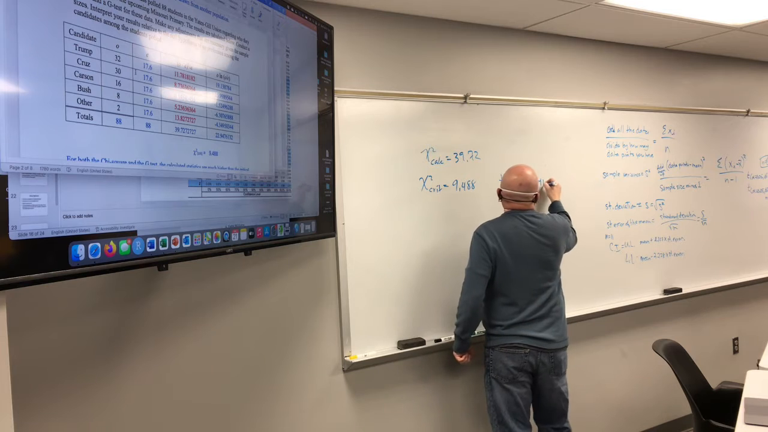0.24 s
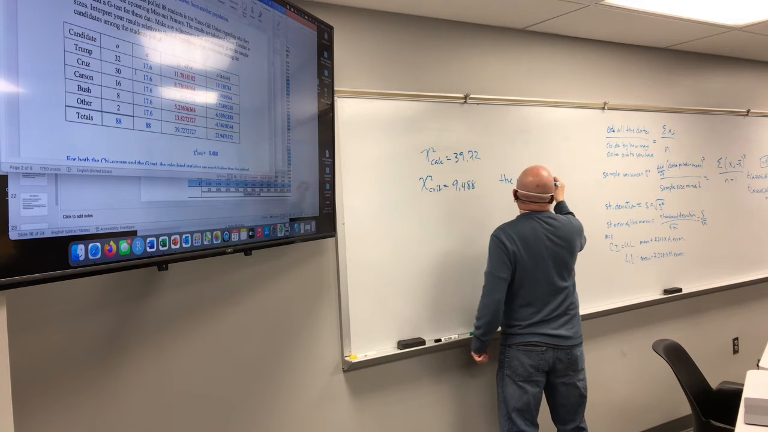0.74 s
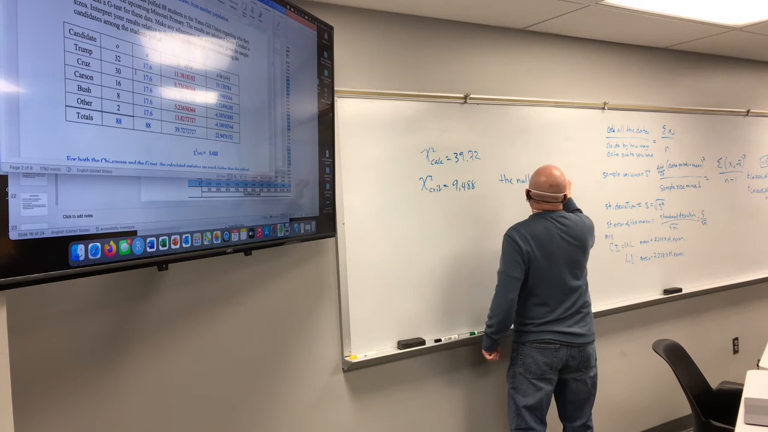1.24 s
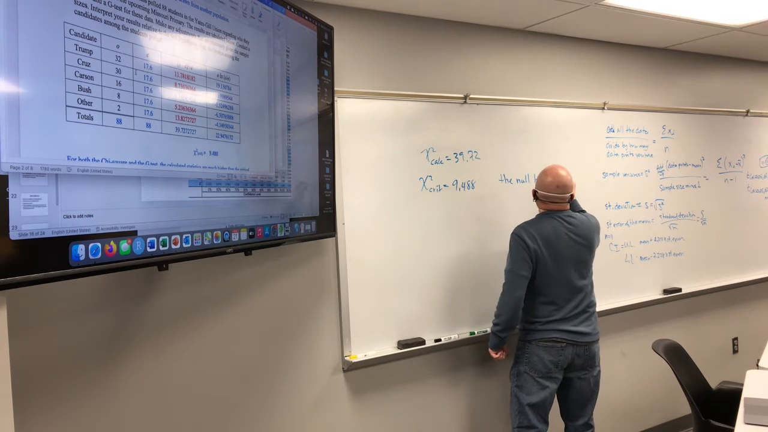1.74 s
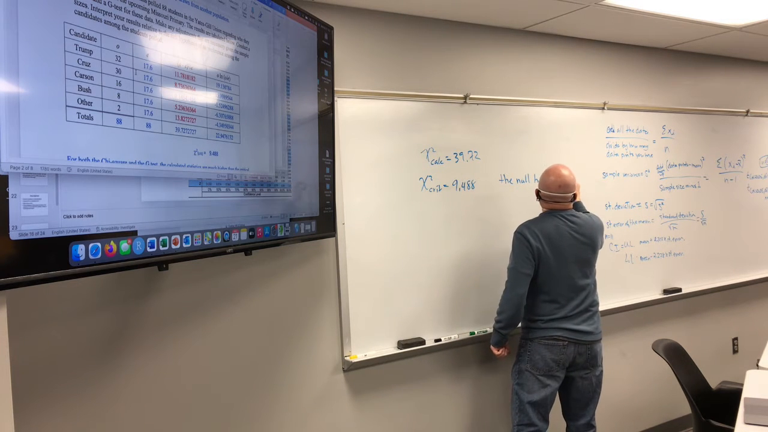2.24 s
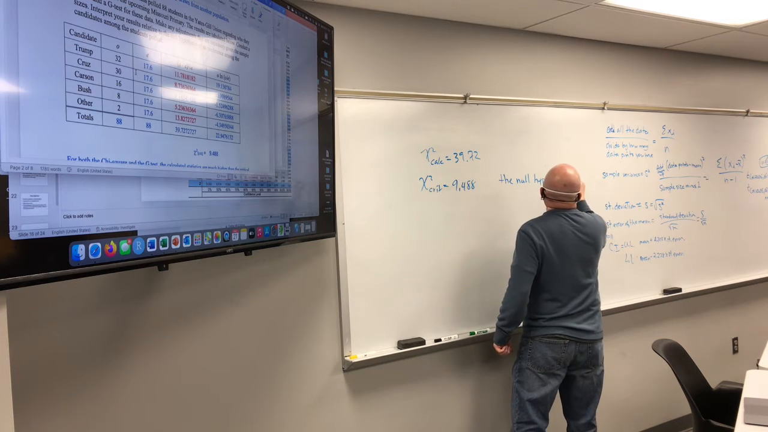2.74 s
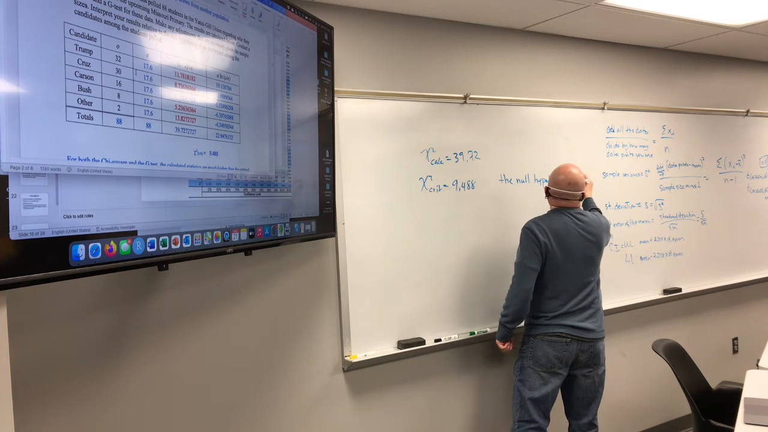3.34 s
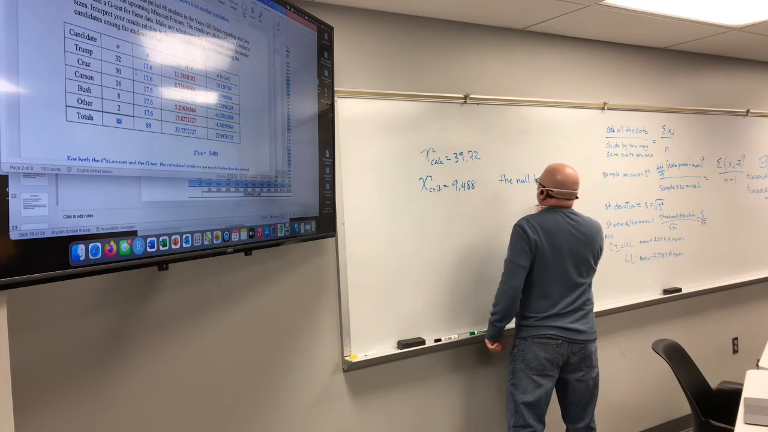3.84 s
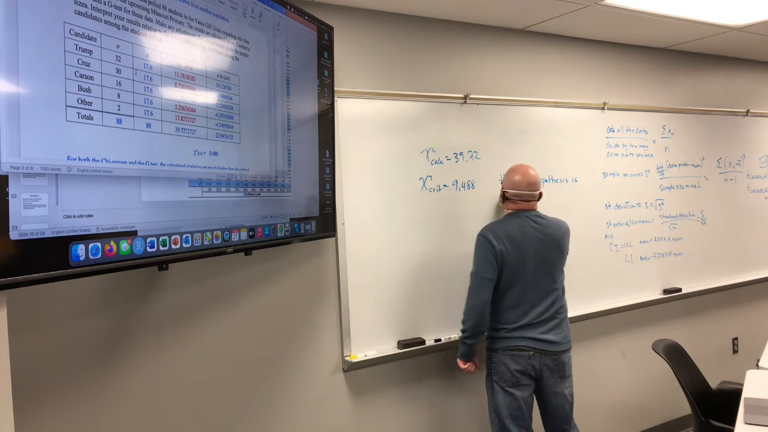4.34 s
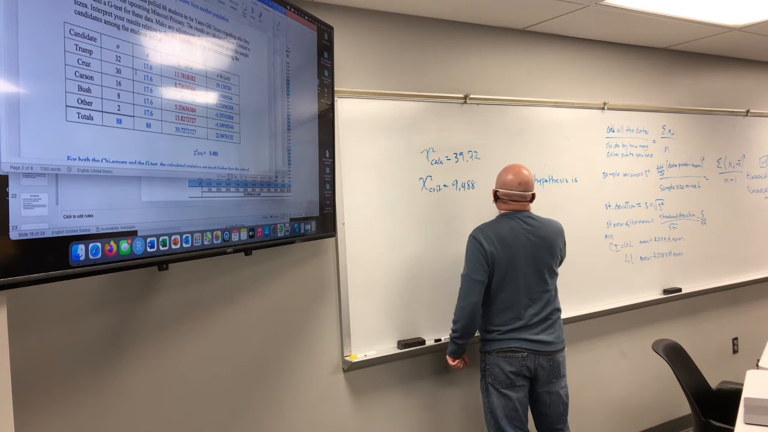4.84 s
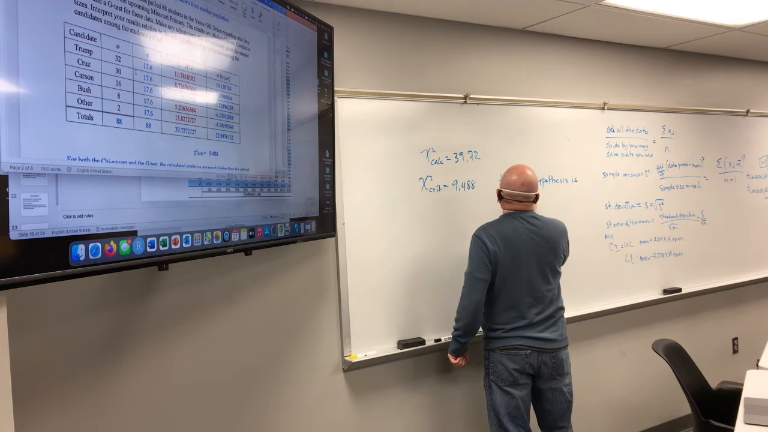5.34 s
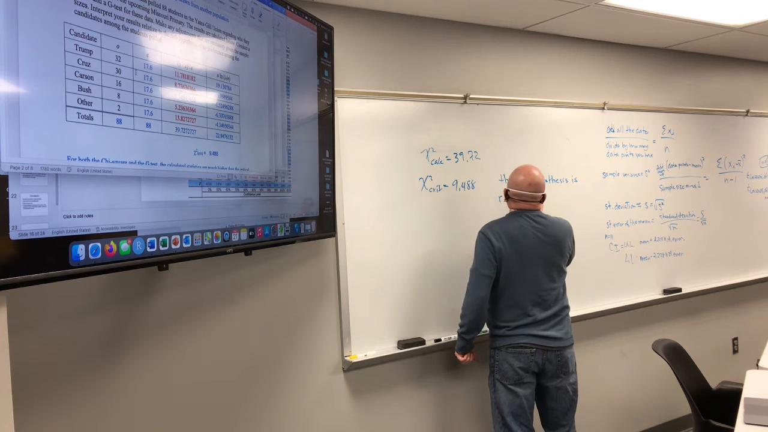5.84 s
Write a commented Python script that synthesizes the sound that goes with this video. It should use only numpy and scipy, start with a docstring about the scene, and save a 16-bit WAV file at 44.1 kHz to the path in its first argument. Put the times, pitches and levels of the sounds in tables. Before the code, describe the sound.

A felt-tip marker writes on a hollow wall-mounted whiteboard in a quiet room, with dull knocks, low droning rubs and faint squeaks.

```python
"""A marker writes on a hollow wall-mounted whiteboard in a quiet classroom, heard through a phone.
Landings strike decaying board modes, a knock and a barrel tick; slow panel modes thud beneath.
Random felt slips drive resonances that drone, rasp, hiss, scrape, squeal and scuff; squeaks are gliding tones.
Filtered noise makes low panel rumbles, faint ventilation, and the room's near scatter and short tail."""
import sys
import numpy as np
from scipy import signal
from scipy.fft import rfft, irfft
from scipy.io import wavfile

SR = 44100
rng = np.random.default_rng(int(sys.argv[2]) if len(sys.argv) > 2 else 0)


def unload_audio(sound):
    """Save the sound as a 16-bit wav file, at the path given as the first command line argument."""
    columns = np.transpose(np.atleast_2d(sound))
    # keep every value between -1 and 1, then stretch to whole-number steps
    steps = np.round(np.clip(columns, -1, 1) * 32767)
    wavfile.write(sys.argv[1], SR, steps.astype(np.int16))


N = 268789
TIME = np.arange(N) / SR

# marker landings: (time [s], blow level [dB], main board mode weight [dB], second board mode weight [dB],
# struck spot resonance [Hz], spot level [dB], spot t60 [s], knock level [dB], knock pitch [Hz],
# barrel tick level [dB], tick top edge [Hz], rebound delay [s], rebound level [dB],
# board pitch [factor], board ring time [factor], level of the short drag that follows, before trim [dB])
LANDINGS = [(0.001, -42.5, 0.0, -3, 590, -10, 0.062, -12, 995, -37, 3000.0, 0.011, -5.5, 1.14, 1.4, -52),
            (0.1, -50, -8.0, 5.5, 495, 5, 0.04, -19, 900.0, -30.0, 3000.0, 0.014, -2.5, 1, 0.7, -52.5),
            (0.134, -50, -6, 1.5, 607, 8, 0.03, -8.5, 1000.0, -20, 2970, 0.011, -16.0, 0.85, 0.84, -52.5),
            (0.2848, -15.5, -4, 0, 664, 4.3, 0.032, 4, 944, -3, 1895, 0.0111, -12.5, 1.09, 0.42, -37),
            (0.3204, -39.5, -10, -1.5, 533, 7, 0.018, -12, 894, -23, 3000.0, 0.014, 0, 0.93, 0.5, -57),
            (0.448, -47, -3, -2.5, 511, 9.5, 0.06, -5, 990, -27.5, 3000.0, 0.01, -10, 0.92, 0.68, -49.5),
            (0.4731, -19.5, -10, -12, 694, -17, 0.036, -22.5, 1060, -36, 3020, 0.006, -10.5, 1.027, 0.79, -54.5),
            (0.7676, -25.5, 1.5, -1.7, 642.8, -5.5, 0.085, -10.5, 1010, -13.5, 5000.0, 0.0114, -7, 1.025, 0.84, -57),
            (1.0602, -23.5, 0.8, -4, 653, -4, 0.085, -3.5, 960, -8.5, 4960, 0.011, -3, 1.054, 0.86, -46.5),
            (1.2654, -24.9, -0.5, -2, 632, -2.5, 0.066, -16.5, 1240, -17.5, 3000.0, 0.013, -13.5, 1.029, 1.24, -45.0),
            (1.426, -42.0, 2, -1.5, 495.0, -11, 0.04, -3, 1200.0, -13, 3008, 0.011, -7, 1.1, 0.75, -61),
            (1.774, -56, 4, -2, 516.0, -13, 0.06, -25.0, 1000.0, -30, 2980, 0.011, -5.0, 0.93, 1.0, -81),
            (2.1114, -38.5, -4.2, -4, 654, -4, 0.0099, -6.5, 1104.0, -23, 5000.0, 0.0107, -3.5, 1.008, 1.4, -54),
            (2.4175, -22.5, -2.5, -3.5, 581, 3, 0.032, -4.5, 920, -16.0, 5000.0, 0.0059, -3.5, 1.078, 1.35, -52.5),
            (2.5787, -24, -4.5, -6, 601.0, -3, 0.029, -5, 815.0, -24, 4970, 0.0057, -16.5, 0.99, 1.35, -51.5),
            (2.717, -32, 4, -1, 615.0, -19, 0.08, -19.5, 1050.0, -30, 4000.0, 0.006, -6, 1.04, 1.35, -52),
            (3.0343, -26, -2, -6, 654.0, -7, 0.053, -5, 876, -14, 4070, 0.014, 1, 1.05, 1.36, -51.5),
            (3.2236, -29, -3, -5.6, 565, -14, 0.041, -24.9, 680.0, -43, 4000.0, 0.0104, -0.3, 1, 0.77, -56.5),
            (3.3986, -25, -1.5, -2.2, 523, -20, 0.085, -22.5, 1083, -33.0, 3996, 0.0104, 0.5, 1.02, 0.59, -49),
            (3.801, -51.5, -4, 2.5, 689, 15, 0.044, 6, 980, -3.5, 5970, 0.01093, -7.0, 1.17, 1.1, -68),
            (4.1844, -30.6, -8.5, -3.5, 601.7, -7.5, 0.057, -25.0, 670, -28, 3980, 0.017, 0, 0.99, 1.47, -52),
            (4.3212, -44.5, -3, 1, 556.7, 16.0, 0.064, -1, 988, -20.0, 4000.0, 0.011, -3.5, 1.03, 1.0, -48.5),
            (4.4823, -43.5, -8, -2, 532, 14.0, 0.048, 2, 1000.0, -16, 3000.0, 0.013, -11, 1.07, 0.8, -63),
            (4.8172, -30, -0.5, 1.3, 565, 11, 0.057, -6, 855, -7.0, 4000.0, 0.013, -8.5, 1.096, 1.52, -47),
            (5.048, -24, -3, -2.2, 598.0, 15.5, 0.021, -10, 684, -16.5, 5970, 0.0051, -11.5, 1.03, 1.65, -52),
            (5.183, -28.5, -2.5, 0, 596.0, -11.5, 0.061, -23, 1235, -22, 4030, 0.018, -15, 1.005, 0.9, -55.5),
            (5.5073, -33.5, -3.8, -6.5, 529.7, -10.7, 0.055, -1.5, 973, -17.0, 5000.0, 0.0112, 0.7, 0.97, 1.3, -54),
            (5.7175, -33.5, -5.5, -3.5, 608.0, -5.5, 0.074, -13.1, 843, -23, 5010, 0.018, -7.5, 0.98, 1.52, -52),
            (5.9605, -26.3, 1.5, 0.1, 691, 15.2, 0.017, -10, 677, -10.5, 3960, 0.0079, -14, 1.057, 1.25, -54)]


def undb(db):
    """Decibels to gain."""
    return 10 ** (np.asarray(db) / 20)


def unit(x):
    """Scale to rms 1."""
    return x / np.sqrt(np.mean(x ** 2))


def band(x, low_hz, high_hz, order=2):
    """Butterworth band-pass."""
    edges = [low_hz, min(high_hz, .45 * SR)]
    return signal.sosfilt(signal.butter(order, edges, "band", fs=SR, output="sos"), x)


def fade(t, t60):
    """Exponential decay, 60 dB down after t60."""
    return np.exp(-np.log(1000) * t / t60)


def ring(t, hz, t60):
    """One struck mode: a decaying sine."""
    return np.sin(2 * np.pi * hz * t) * fade(t, t60)


def walk(rate):
    """Smooth random wander around zero, with a new target rate times a second."""
    return np.interp(TIME * rate, np.arange(4096), rng.standard_normal(4096))


def resonate(x, modes, order=2, patchy_db=0):
    """Steep-sided resonances driven by x, at rms 1; each may swell and fade on its own as the tip moves."""
    total = 0
    for hz, width, db in modes:
        gain = undb(db + (patchy_db * walk(25) if patchy_db else 0))
        total = total + gain * band(x, max(hz - width / 2, hz / 10), hz + width / 2, order=order)
    return unit(total)


def slide(x, stretch):
    """Move the resonances of x together by a factor that changes over time."""
    return np.interp(np.cumsum(stretch) % N, np.arange(N), x)


def swells(events, shape=1.3):
    """Gain over time of overlapping swells, each (peak [s], rise [s], fall [s], level [dB])."""
    power = np.zeros(N)
    for s, rise, fall, db in events:
        near = slice(*np.searchsorted(TIME, [s - 4 * rise, s + 4 * fall]))
        away = np.maximum((s - TIME[near]) / rise, (TIME[near] - s) / fall)
        power[near] += (undb(db) * np.exp(-np.abs(away) ** shape)) ** 2
    return np.sqrt(power)


def taps(knock_t60=0.0089, soft_hz=860, radiate_hz=280, buzz_db=-15, buzz_t60=0.19,
         press_s=0.00099, blur_db=-13.5, blur_t60=0.1, tick_lag_s=.0022, rattle_db=-17, rattle_t60=0.09,
         room_db=-4.5):
    """The tip lands: the board's modes, a resonance of the spot it hits, and a tick from the barrel."""
    # the board's modes before each spot's tuning and damping, main first: (pitch [Hz], level [dB], t60 [s])
    board = [(368.8, 4, 0.068), (429.3, 5.5, 0.047), (224, 1.5, 0.06), (492.4, -9, 0.07)]
    # modes of the marker's barrel: (pitch [Hz], level [dB], t60 [s])
    barrel = [(1798, -18.5, .03), (2750, -12, 0.0057), (3900, -11, 0.0023), (5700, -22, 0.011)]
    out, t = np.zeros(N + 2 * SR), TIME[:SR // 2]
    for (s, blow_db, main_db, second_db, spot_hz, spot_db, spot_t60, knock_db, knock_hz, tick_db, tick_hz,
         rebound_s, rebound_db, tuning, sustain, _) in LANDINGS:
        # every spot on the panel has its own mix of modes, tuning and damping
        body = undb(spot_db) * ring(t, spot_hz, spot_t60)
        for (hz, db, t60), weight_db in zip(board, (main_db, second_db, 0, 0)):
            body += undb(db + weight_db) * ring(t, hz * tuning, t60 * sustain)
        # many weak modes blur the ring into a thud
        blur = unit(band(rng.standard_normal(len(t)), 290, 740))
        body += undb(blur_db) * blur * fade(t, blur_t60 * sustain)
        # soft felt rounds the blow, and the panel radiates little bass
        body = band(body * (1 - np.exp(-t / press_s)), radiate_hz, soft_hz, order=5)
        # a short knock, with the panel's dense upper modes stirred behind it
        knock = band(ring(t, knock_hz, knock_t60), 710, 1300, order=4)
        buzz = band(rng.standard_normal(len(t)) * fade(t, buzz_t60), 400, 1300, order=3)
        body += undb(knock_db) * (knock + undb(buzz_db) * buzz)
        # the blow comes back as a second bump, sooner or later from spot to spot
        hit = body + undb(rebound_db) * np.interp(t - rebound_s, t, body, left=0)
        # the barrel ticks once the felt is compressed, brighter when the tip lands steeply
        tick = sum(undb(db) * ring(t, hz, t60) for hz, db, t60 in barrel)
        rattle = band(rng.standard_normal(len(t)) * fade(t, rattle_t60), 1200, 3600)
        tick = band(tick + undb(rattle_db) * rattle, 600, tick_hz, order=3)
        hit += undb(tick_db) * np.interp(t - tick_lag_s, t, tick, left=0)
        heard = signal.fftconvolve(hit, room(room_db))
        start = max(int(s * SR), 0)
        out[start:start + len(heard)] += undb(blow_db) * heard
    return out[:N]


def thuds(delay_s=.007, spread_octaves=0.14):
    """Every landing bumps the whole panel's slow modes, which swell dully and die away."""
    # panel modes at the reference blow, before random detuning: (pitch [Hz], level [dB], swell [s], t60 [s])
    panel = [(194, -45.5, 0.0026, 0.11), (117, -55, 0.035, 0.3)]
    reference_blow_db, growth = -25, 0.55  # growth: dB of thud per dB of blow
    out = np.zeros(N)
    for (s, blow_db, *_), chance in zip(LANDINGS, rng.standard_normal(len(LANDINGS))):
        start = int((s + delay_s) * SR)
        t = TIME[:min(SR // 2, N - start)]
        detune = 2 ** (spread_octaves * chance)
        bump = sum(undb(db) * ring(t, hz * detune, t60) * (1 - np.exp(-t / swell))
                   for hz, db, swell, t60 in panel)
        out[start:start + len(t)] += undb(growth * (blow_db - reference_blow_db)) * bump
    return out


def slips(rate=3000, spread_db=3, judder_db=2.6, judder_rate=90):
    """Felt fibres catch and let go: dense uneven clicks that come in small bursts."""
    caught = rng.random(N) < rate / SR
    size = rng.standard_normal(N) * undb(spread_db * rng.standard_normal(N))
    return caught * size * undb(judder_db * walk(judder_rate))


def fine_slips():
    """The finest fibres slip so densely and evenly that the clicks merge."""
    return slips(rate=14000, spread_db=2, judder_db=1.2)


def strokes(level_db=-1.5, drone_wander=.025, wander_rate=14):
    """Each stroke or rub presses, then flicks away; its slips sound the panel and the felt."""
    # strokes and short rubs of the tip, levels before trim: (peak pressure time [s], rise [s], fall [s],
    # drone pitch before wander [Hz], drone level [dB], grit level [dB], scratch level [dB], hiss level [dB])
    rubs = [ (0.195, 0.05, 0.035, 654, -45, -56, -62, -74),
            (0.251, 0.022, 0.014, 519.5, -36, -41.5, -53.5, -64),
            (0.272, 0.025, 0.013, 540.2, -38, -33.5, -49.5, -61),
            (0.334, 0.008, 0.0068, 531.4, -41, -49, -50.5, -52),
            (0.378, 0.016, 0.019, 512, -39.5, -40, -50, -60.5),
            (0.415, 0.024, 0.014, 527.7, -43.5, -44.5, -51.5, -70),
            (0.53, 0.035, 0.29, 519, -53.5, -73.5, -74, -72.5),
            (0.85, 0.0093, 0.014, 520.4, -45.5, -60, -71.5, -77),
            (1.102, 0.016, 0.018, 600.3, -40.5, -39.5, -53.5, -65.5),
            (1.341, 0.012, 0.011, 554.5, -44.5, -50, -59, -73),
            (1.372, 0.0081, 0.012, 555.7, -50, -55, -64, -72),
            (1.41, 0.0063, 0.009, 542, -45.5, -55, -64, -71),
            (1.434, 0.026, 0.055, 542.6, -44.5, -59, -59.5, -55),
            (1.599, 0.45, 0.054, 553, -72, -71, -73.5, -70.5), (1.961, 0.99, 0.45, 555, -74, -68, -79, -71),
            (2.251, 0.046, 0.077, 554, -51, -71, -74, -82),
            (2.381, 0.096, 0.025, 604.2, -51.5, -62, -72, -71),
            (2.8, 0.026, 0.03, 500.8, -55.5, -56.5, -80, -77.5),
            (3.446, 0.013, 0.016, 572.4, -67, -53, -60, -81), (3.524, 0.027, 0.04, 590, -53, -58, -65, -69),
            (3.65, 0.065, 0.1, 590.4, -59.5, -65, -73, -72),
            (3.803, 0.0033, 0.078, 559, -52, -51.5, -61.5, -72),
            (3.901, 0.03, 0.076, 573.4, -52, -62, -78, -84),
            (4.262, 0.021, 0.054, 585.6, -43.5, -51, -65, -75),
            (4.36, 0.026, 0.025, 604.7, -39.5, -49, -70, -62),
            (4.425, 0.054, 0.057, 558.6, -45, -49.5, -71, -57),
            (4.489, 0.067, 0.067, 534.8, -42.5, -49.5, -52, -51.5),
            (4.568, 0.025, 0.012, 546.7, -40.5, -69, -72, -56),
            (4.684, 0.027, 0.042, 571.6, -53.5, -75, -77.5, -69.5),
            (4.9, 0.015, 0.018, 658.3, -53, -57.5, -71, -70.5),
            (5.116, 0.014, 0.018, 697.3, -42.5, -51.5, -75, -75),
            (5.385, 0.095, 0.019, 557, -87, -66.5, -77, -71),
            (6.012, 0.008, 0.012, 589.6, -37, -52.5, -67, -72.5)]
    # resonances of the panel (drone, before sliding; rasp; scratch) and felt (hiss): each (centre [Hz], width
    # [Hz], relative level [dB])
    drone_modes = [(563, 93, 0.5), (685, 17, -9.5), (382.8, 74, -6.5), (238, 42, -16), (119, 140, -27.5)]
    rasp_modes = [(540, 480, -2), (918, 170, -0.5), (1081, 50, -2)]
    scratch_modes = [(1345, 190, -0.5), (1206, 60, -2.5), (1720, 330, -9.5)]
    hiss_modes = [(3250, 2660, 6.7), (6340, 330, 4)]
    drone = resonate(slips(judder_db=1.2), drone_modes, patchy_db=2.5)
    hiss = resonate(fine_slips(), hiss_modes)
    rasp = resonate(slips(), rasp_modes, order=3, patchy_db=3.5)
    scratch = resonate(slips(), scratch_modes, order=3, patchy_db=3.5)
    # the drone's pitch follows the spot on the panel and wavers slightly
    rub_s, _, _, drone_hz, *_ = np.transpose(rubs)
    spot_pitch = np.interp(TIME, rub_s, drone_hz) / drone_modes[0][0]
    drone = slide(drone, spot_pitch * (1 + drone_wander * walk(wander_rate)))
    # the drag after every landing has one shape; grit, scratch and hiss are relative to its level
    peak_s, rise_s, fall_s = 0.013, 0.02, 0.085
    grit_rel_db, scratch_rel_db, hiss_rel_db = -10, -20.5, -20.5
    drags = [(s + peak_s, rise_s, fall_s, 0, db, db + grit_rel_db, db + scratch_rel_db, db + hiss_rel_db)
             for s, *_, db in LANDINGS]
    s, rise, fall, _, drone_db, grit_db, scratch_db, hiss_db = np.transpose(rubs + drags)
    # the tip is fastest, and hisses most, after the pressure peaks
    lag = 0.44 * np.minimum(rise, fall)
    return undb(level_db) * (drone * swells(zip(s, rise, fall, drone_db))
                             + rasp * swells(zip(s, rise, fall, grit_db))
                             + scratch * swells(zip(s, rise, fall, scratch_db))
                             + hiss * swells(zip(s + lag, (rise + lag) / 2, fall, hiss_db)))


def coloured_rubs(level_db=-1):
    """Slips in short coloured bands, from a landing's crack and low scrape to hoarse squeal and hiss."""
    # short coloured rubbing bands, levels before trim:
    # (loudest moment [s], half length [s], centre [Hz], width [Hz], level [dB])
    rub_bands = [ (0.004, 0.025, 2540, 253, -68.5), (0.211, 0.026, 2570, 350, -69.5),
                 (0.2865, 0.0024, 1610, 590, -40.5), (0.298, 0.012, 2330, 252, -58.5),
                 (0.362, 0.0095, 2600, 200, -53.5), (0.401, 0.0097, 2680, 300, -60),
                 (0.41, 0.016, 1330, 180, -52.5), (0.56, 0.02, 1850, 360, -68.5),
                 (1.107, 0.016, 3510, 900, -65.5), (1.305, 0.016, 3120, 800, -64.5),
                 (1.3, 0.011, 6750, 700, -65.5), (1.431, 0.0044, 1440, 254, -48.5),
                 (1.465, 0.027, 3300, 646, -53), (3.48, 0.097, 2775, 1018, -70),
                 (3.528, 0.042, 1600, 600, -66.5), (3.657, 0.054, 2450, 1000, -65),
                 (3.735, 0.019, 2408, 452, -73), (4.311, 0.025, 2370, 520, -51),
                 (4.343, 0.022, 2340, 750, -49.5), (4.381, 0.023, 2470, 900, -54),
                 (4.429, 0.027, 2470, 750, -50), (4.437, 0.096, 937, 159.9, -50.5),
                 (4.473, 0.015, 1500, 550, -44.5), (4.49, 0.0075, 2350, 400, -44),
                 (4.519, 0.013, 2730, 501.3, -47), (4.541, 0.027, 2140, 800, -52.5),
                 (4.555, 0.016, 3390, 601, -56.5), (4.572, 0.01, 1850, 300, -56),
                 (4.844, 0.019, 1800, 347, -64), (4.849, 0.027, 2918, 706, -64),
                 (5.758, 0.081, 3010, 701, -72.5), (5.987, 0.015, 1750, 300, -65.5),
                 (6.006, 0.013, 2670, 459, -67)]
    # the slips flutter as the tip grabs and lets go: mean rate, relative wander, depth 0-1
    flutter_hz, flutter_wander, flutter_depth = 62, .25, .35
    flutter_rate = flutter_hz * (1 + flutter_wander * walk(40))
    grab = np.sin(2 * np.pi * np.cumsum(flutter_rate) / SR)
    felt = fine_slips() * (1 + flutter_depth * grab)
    return undb(level_db) * sum(resonate(felt, [(hz, width, 0)]) * swells([(s, length, length, db)])
                                for s, length, hz, width, db in rub_bands)


def squeaks(jitter=0.014, octave_db=-20):
    """For a moment the slips lock into a regular, rising tone with a faint octave above."""
    # brief clean squeaks of the tip: (loudest moment [s], half length [s], pitch at that moment before
    # jitter [Hz], glide [octaves/s], level [dB])
    tones = [(0.897, 0.0054, 1780, 8, -56), (2.41, .025, 586, 1.83, -45.5),
             (4.713, 0.032, 585, 0.85, -55.5)]
    out = np.zeros(N)
    for s, length, hz, glide, db in tones:
        octaves = glide * np.clip(TIME - s, -2 * length, 2 * length)
        pitch = hz * 2 ** octaves * (1 + jitter * walk(180))
        phase = 2 * np.pi * np.cumsum(pitch) / SR
        tone = np.sin(phase) + undb(octave_db) * np.sin(2 * phase)
        out += undb(db) * np.exp(-((TIME - s) / length) ** 2) * tone
    return out


def scuffs(body_hz=1650, body_width_hz=850, edge_width_hz=1200):
    """The tip skids: a gritty burst that starts at once and dies away."""
    # skids: (start [s], t60 [s], body level [dB], bright edge centre [Hz], edge level [dB])
    skids = [(2.512, 0.3, -55.5, 4000, -61.5), (3.8, 0.44, -60.5, 2386, -63)]
    out = np.zeros(N)
    for s, t60, body_db, edge_hz, edge_db in skids:
        grit = fine_slips()
        body = undb(body_db) * resonate(grit, [(body_hz, body_width_hz, 0)])
        edge = undb(edge_db) * resonate(grit, [(edge_hz, edge_width_hz, 0)])
        out += (body + edge) * (TIME >= s) * fade(np.abs(TIME - s), t60)
    return out


def rumbles(width_share=0.39):
    """Dull, low rumbles of the panel under the writing hand: swelling narrow-band noise."""
    # panel rumbles: (loudest moment [s], rise [s], fall [s], centre [Hz], level [dB])
    swellings = [(0.477, 0.0058, 0.0081, 129, -58.5), (0.481, .006, .014, 62, -63.5),
                 (1.115, .014, 0.014, 247, -49.5), (1.215, 0.014, .02, 215, -55.5),
                 (1.785, 0.023, 0.026, 305, -65), (2.965, 0.037, .03, 235, -61.5),
                 (3.41, .012, 0.029, 125, -57), (2.434, 0.0074, 0.018, 165.4, -52.5),
                 (3.865, 0.039, 0.048, 333.7, -48.5), (4.295, 0.035, 0.04, 124.3, -58),
                 (4.3, 0.025, 0.022, 287.4, -51.5), (4.41, 0.038, 0.072, 252, -57.5),
                 (4.43, .05, 0.059, 117, -66), (5.008, .02, .015, 263, -61.5),
                 (5.12, .012, 0.012, 153, -49.5), (5.205, 0.018, 0.028, 108, -54.5),
                 (5.295, .015, 0.016, 105.7, -55)]
    return sum(resonate(rng.standard_normal(N), [(hz, width_share * hz, 0)]) * swells([(s, rise, fall, db)])
               for s, rise, fall, hz, db in swellings)


def room(shadow_db=0, scatter_db=-7, scatter_t60=0.18, gap_s=0.0088):
    """Response from the board: direct sound, scatter off furniture, then a tail whose lows stay longest."""
    # the tail's bands: (low edge [Hz], high edge [Hz], t60 [s], level before the shadow offset [dB])
    tail = [(95, 320, 0.44, -4), (304, 1300, 0.35, -18), (930, 15000, 0.12, -28)]
    t = TIME[:SR * 3 // 4]
    build_up = np.clip(t / gap_s - 1, 0, 1)
    response = np.zeros(len(t))
    for low_hz, high_hz, t60, db in tail + [(212, 3400, scatter_t60, scatter_db)]:
        decay = build_up * fade(t, t60)
        echoes = band(rng.standard_normal(len(t)) * decay, low_hz, high_hz)
        response += undb(db + shadow_db) * echoes / np.linalg.norm(decay)
    response[0] += 1  # direct sound
    return response


def ventilation(level_db=-65):
    """Soft air noise: a restless low rumble under smooth hiss."""
    # spectrum of the air noise: (frequency [Hz], relative density [dB per Hz])
    spectrum = [(18, -52), (30, -25.5), (218, 2), (474, -7), (582, -17), (1080, -19), (1180, -18),
                (1450, -18.5), (2290, -21.5), (2620, -24), (3010, -24), (7000, -31.5), (9100, -86.5),
                (15400, -120)]
    hz, db = np.transpose(spectrum)
    bins_hz = np.arange(N // 2 + 1) * SR / N
    colour = undb(np.interp(np.log(bins_hz + 1), np.log(hz), db))
    air = unit(irfft(rfft(rng.standard_normal(N)) * colour, N))
    rumble = signal.sosfiltfilt(signal.butter(2, 500, fs=SR, output="sos"), air)
    # the lows waver quickly, the whole slowly and slightly
    restless = undb(.5 * walk(2)) * (air + rumble * (undb(1.8 * walk(12)) - 1))
    return undb(level_db) * restless


def scene(stroke_room_db=-3):
    """Taps and strokes in the classroom, over ventilation."""
    rubbing = strokes() + coloured_rubs() + scuffs() + squeaks()
    writing = signal.fftconvolve(rubbing + thuds() + rumbles(), room(stroke_room_db))[:N]
    return (taps() + writing + ventilation())[None]


def record(dry, top_hz=7150):
    """The phone steeply cuts everything above its speech band."""
    return signal.sosfilt(signal.ellip(8, .3, 70, top_hz, fs=SR, output="sos"), dry)


dry = scene()
out = record(dry)
unload_audio(out)
```